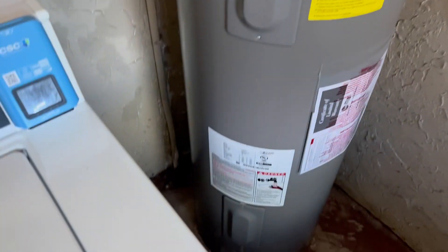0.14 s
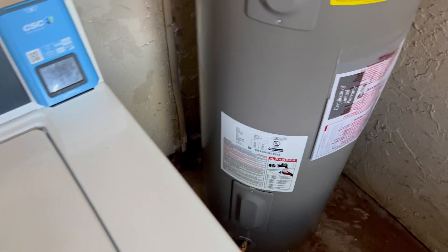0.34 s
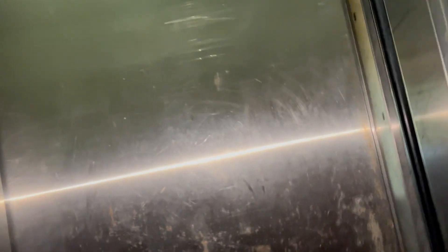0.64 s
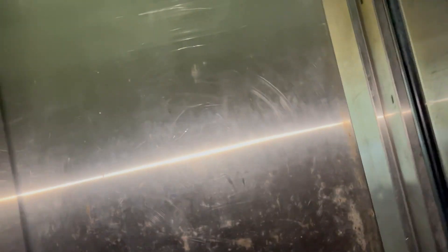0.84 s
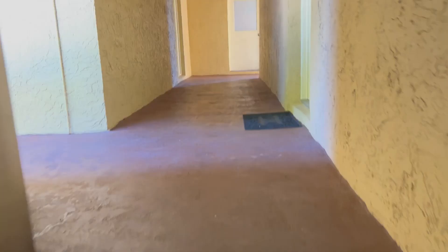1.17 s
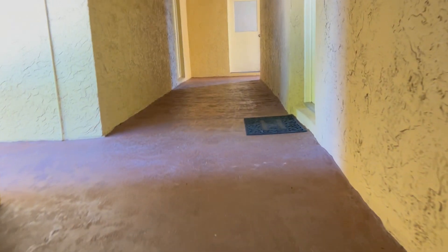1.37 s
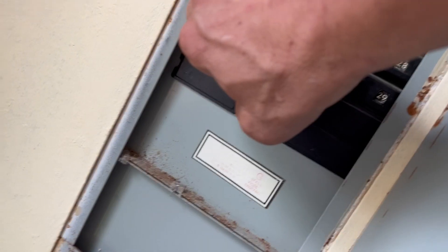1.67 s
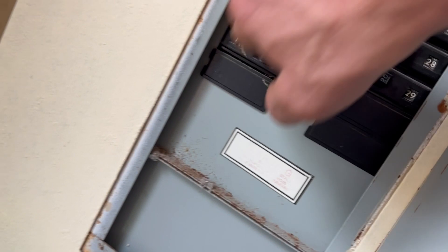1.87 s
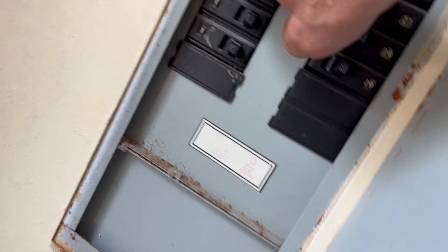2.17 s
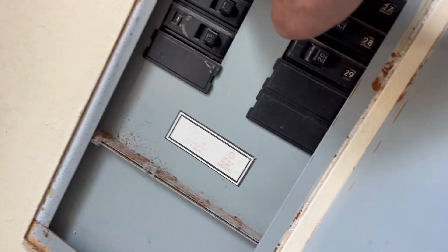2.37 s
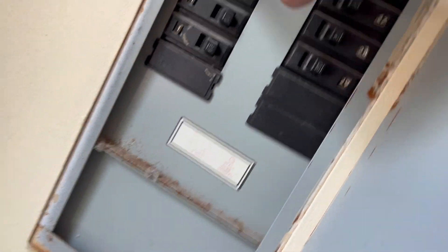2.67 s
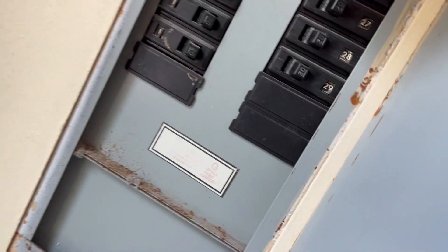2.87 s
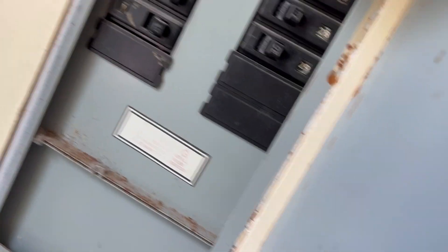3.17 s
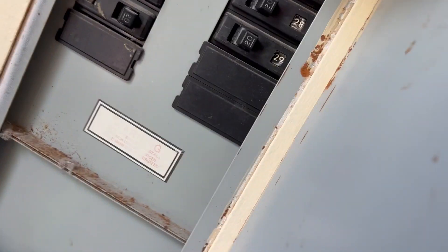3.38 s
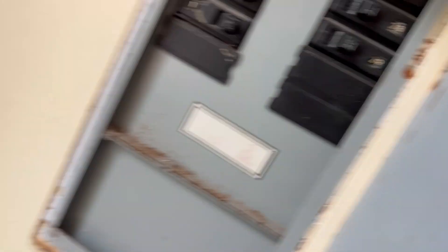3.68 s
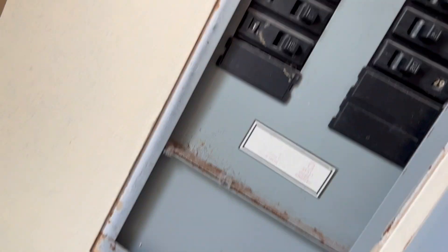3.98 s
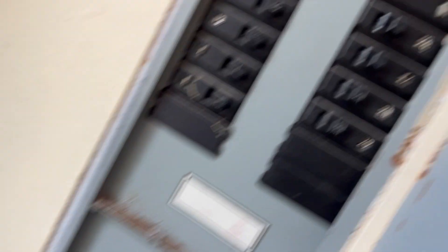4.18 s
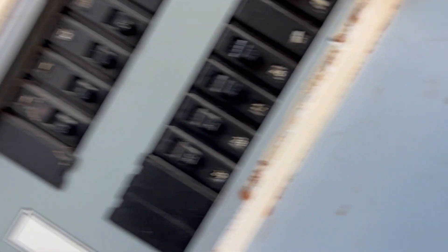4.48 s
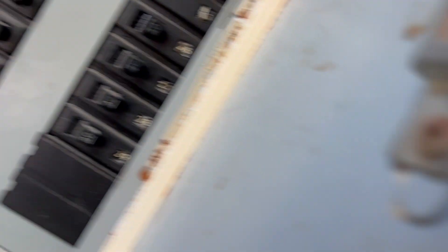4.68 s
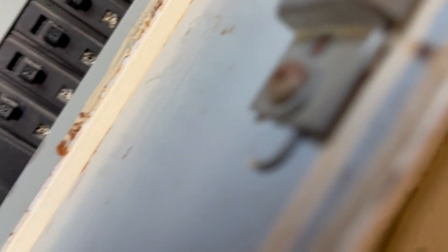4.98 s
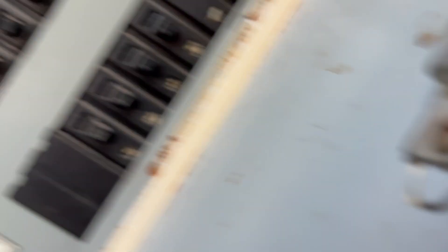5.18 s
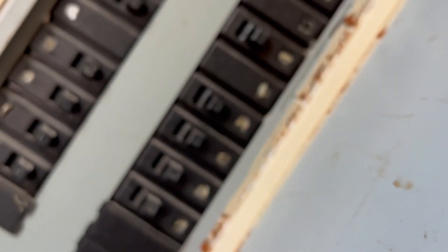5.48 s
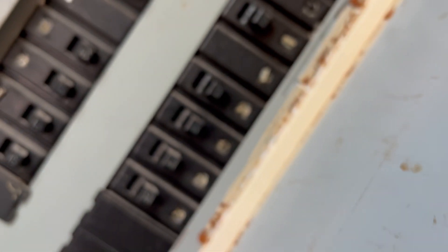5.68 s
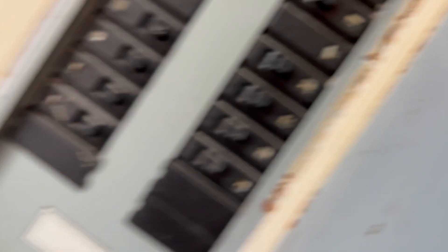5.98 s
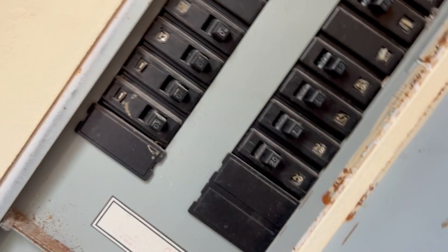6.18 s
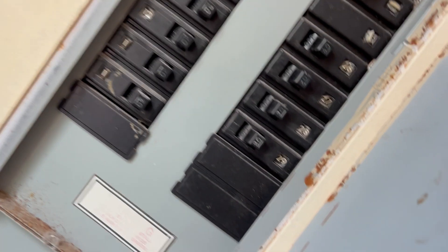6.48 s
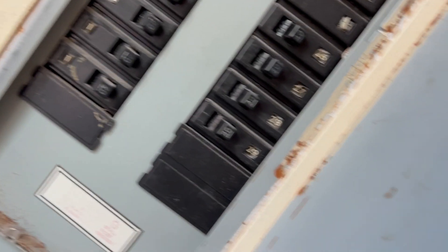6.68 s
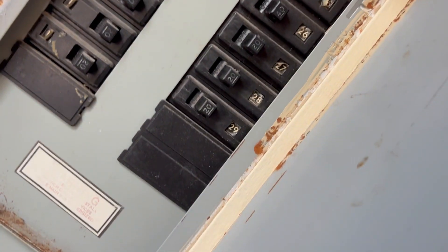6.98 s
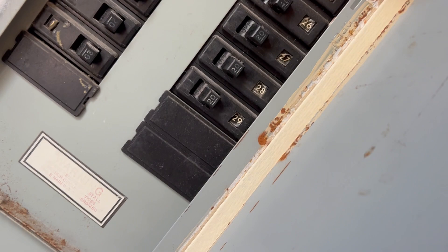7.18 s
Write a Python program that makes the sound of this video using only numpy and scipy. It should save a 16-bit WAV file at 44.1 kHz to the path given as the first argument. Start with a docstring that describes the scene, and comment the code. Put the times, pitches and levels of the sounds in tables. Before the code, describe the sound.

After a quiet humming closet and rumbling lift doors, stiff circuit breakers snap over loudly one by one in a hard, echoing room.

```python
"""Toggles tick, snap and bounce on a steel breaker panel in a hard room, with soft thuds nearby; before that come
a quiet closet, a lift car whose doors rumble and a corridor with a door rolling farther off, joined by short fades.
Contacts are bursts of shaped noise answered by steel and walls, thuds are decaying sines in a hollow wall,
doors, scrapes, squeaks and air are filtered noise. Two microphones hear it all, held otherwise in the lift."""
import sys
import numpy as np
from scipy import signal
from scipy.fft import rfft, irfft, next_fast_len
from scipy.io import wavfile
from scipy.ndimage import map_coordinates

SR = 44100
rng = np.random.default_rng(int(sys.argv[2]) if len(sys.argv) > 2 else 0)


def wav_record(signal):
    """Record a signal, one row per channel, as 16-bit PCM in the file named by sys.argv[1]."""
    frames = np.transpose(np.atleast_2d(signal))
    bounded = np.clip(frames, -1, 1)
    # unit amplitude maps onto the largest positive 16-bit level
    quanta = np.round(bounded * 32767).astype(np.int16)
    wavfile.write(sys.argv[1], SR, quanta)


def field_ratio(decibels):
    """Amplitude ratio for a level in dB (20 dB per decade); scalars and array-likes work."""
    return 10 ** (np.asarray(decibels, dtype=float) / 20)


N = 323253

# breakers thrown over: (t/s, level/dB, travel/s, relative latch click/dB, relative thump/dB)
THROWS = [(1.6073, -11.5, .026, 1.5, -6), (2.366, -8, 0.027, -2, -8), (3.516, -7.5, 0.022, -5, -14.5),
          (3.786, -6.5, .025, -3.5, -14), (4.9806, -3.5, .032, -10.5, -18.5),
          (5.8355, -6.5, .025, -2, -13.5), (6.5185, -8.5, 0.031, -5.5, -8.5),
          (7.0585, -8.5, .028, -10.5, -11)]
# the breaker of each throw: (clack pitch f/Hz, relative sparkle/dB, change of level along the travel/dB,
# spring pitch f/Hz, spring level/dB)
BREAKERS = [(2850, -11.5, 3.5, 2290, -40.5), (2660, -1.5, .3, 1400, -25.5), (3250, -4.5, 0.5, 3900, -32.5),
            (3700, -5, -3.5, 1947, -28), (3250, -3.5, 0.5, 3180, -28), (3700, -7.5, -1.5, 3600, -30),
            (3280, -5.5, -1.4, 1145, -29.5), (3230, -3, 1.5, 3090, -31)]


def unit(x):
    """Scaled to rms 1."""
    return x / np.sqrt(np.mean(x ** 2) + 1e-20)


def along(points, hz):
    """Reads (f/Hz, value) points on a log frequency axis."""
    f, v = np.transpose(points)
    return np.interp(np.log(hz + 1), np.log(f + 1), v)


def curves(rows):
    """One value per sample for each column after the time."""
    s, *cols = np.transpose(rows)
    return [np.interp(np.arange(N) / SR, s, c) for c in cols]


def wobble(rate):
    """A smooth random curve, rate knots a second."""
    knots = rng.standard_normal(int(N * rate / SR) + 4)
    return map_coordinates(knots, [np.arange(N) * rate / SR])


def filtered(x, response):
    """x shaped by a complex response of frequency."""
    m = next_fast_len(x.shape[-1] + 8192)
    spectrum = rfft(x, m) * response(np.fft.rfftfreq(m, 1 / SR))
    return irfft(spectrum, m)[..., :x.shape[-1]]


def noise(shape, response):
    """Coloured noise of rms 1."""
    return unit(filtered(rng.standard_normal(shape), response))


def peaks(modes, f):
    """Causal response of (f/Hz, width/Hz, level/dB) resonances."""
    return sum(field_ratio(db) * 1j * f * w / (c * c - f * f + 1j * f * w) for c, w, db in modes)


def band(lo_hz, hi_hz, f):
    """Steep band pass."""
    return 1 / np.sqrt((1 + (lo_hz / (f + 1)) ** 8) * (1 + (f / hi_hz) ** 8))


def contacts():
    """A throw slips its latch, lands its blade, then stops and rebounds; a tick is a single touch.
    Rows are (t/s, level/dB, thump/dB, sparkle/dB, pitch f/Hz)."""
    # blade landing, handle stop, rebound: (share of the travel, relative level/dB, thump change/dB,
    # sparkle change/dB)
    stages = [(.22, 0.63, -1, -1.2), (.62, 0.4, -0.7, -14), (1, -5, -9.5, -15)]
    # handles and fingernails: (t/s, level/dB, relative thump/dB, relative sparkle/dB, clack pitch f/Hz)
    ticks = [(2.1327, -37.5, -5, -28, 1264), (2.2096, -39.5, -6, -5, 1195),
             (2.2497, -23, -10.5, -1.5, 1387), (2.3492, -18.5, -17, -5, 1374),
             (2.8829, -37, -10, -20, 2700), (2.987, -44.5, -16, 2.5, 2070), (3.043, -44, -4, 0.5, 1240),
             (3.0632, -30, -11, -13, 5870), (3.1023, -34, -13, -5.5, 4970), (3.2285, -36.5, -9, -17, 2590),
             (3.28, -39, -24, -18, 2620), (3.2937, -19.5, -9.5, -4.5, 4260), (3.3817, -27, -15, -12, 1366),
             (4.1878, -45, -5, 2, 2800), (4.783, -9.5, -19.5, -9, 2946),
             (4.9248, -25.5, -20.5, -12.5, 3224), (5.583, -16, -16, -7.5, 2512), (6.217, -45, -6, 0, 2910),
             (6.2603, -33, -5.5, -27, 2600), (6.2949, -44, 3.5, -1, 2270), (6.4248, -17.5, -17, -1, 5700),
             (6.988, -14, -12, -4, 4080)]
    latches = [(s, db + latch_db, -34, -2.5, 4800) for s, db, _, latch_db, _ in THROWS]
    blows = []
    for (s, db, travel, _, thump_db), (hz, spark_db, later_db, *_) in zip(THROWS, BREAKERS):
        for share, stage_db, less_db, duller_db in stages:
            level_db = db + stage_db + share * later_db
            blows.append((s + share * travel, level_db, thump_db + less_db, spark_db + duller_db, hz))
    return latches + blows + ticks


def breakers():
    """Each contact: a sharp sparkle and a plastic clack with the walls' answer; the box thumps late, springs ring on."""
    # steel cover, heard in every tail: (f/Hz, width/Hz, level/dB)
    cover_modes = [(880, 60, 0), (1230, 50, 1), (1420, 50, 0), (1965, 50, 1), (2290, 50, 0), (2800, 70, 1),
                   (3080, 60, 1), (3300, 50, 2), (3560, 70, 1), (4190, 60, 0), (5430, 80, 0),
                   (5960, 80, -1)]
    # colour of the plastic crack: (f/Hz, level/dB per Hz)
    crack_colour = [(300, -41), (900, -0.5), (2000, -2.5), (3500, -1), (5500, -4), (7000, -9), (9000, -19)]
    # colour of the box thump: (f/Hz, level/dB per Hz)
    thump_colour = [(60, -37.5), (120, -7), (280, -8), (450, -3), (900, -14.5), (1500, -5.5), (2500, -43.5)]
    sharp, long, t = np.zeros((2, N + SR)), np.zeros(N + SR), np.arange(SR // 3) / SR
    s, db, thump_db, spark_db, clack_hz = np.transpose(contacts())[:, :, None, None]
    shape = (len(s), 2, len(t))

    def plastic(f, hump_db):
        hump = np.exp(-(np.log2((f + 1) / clack_hz) / 0.15) ** 2)
        return field_ratio(along(crack_colour, f) + hump_db * hump)

    def bright(f):
        return band(7900, 10700, f) * field_ratio(-f / 1500)

    # each blow drives the cover's modes differently
    strength = field_ratio(1.4 * rng.standard_normal((len(s), len(cover_modes), 1, 1)))

    def steel(f):
        return 1 + sum(strength[:, k] * np.abs(peaks([mode], f)) ** 2 for k, mode in enumerate(cover_modes))

    def wall_colour(f):
        clack_answer = field_ratio(20.5) * plastic(f, hump_db=5.0) * steel(f)
        return clack_answer + field_ratio(spark_db + 28.5) * bright(f)

    snap = field_ratio(-60 * t / .024) * (1 - np.exp(-t / .0007))
    clacks = noise(shape, lambda f: plastic(f, hump_db=11.0)) * field_ratio(-2.5) * snap
    sparks = noise(shape, bright) * field_ratio(spark_db + 2.0 - 60 * t / 0.017)
    walls = filtered(tails(len(s), early_db=9.0), wall_colour)
    swell = field_ratio(thump_db - 2.0 - 60 * t / 0.15) * (1 - np.exp(-t / 0.0051))
    thumps = noise(shape, lambda f: field_ratio(along(thump_colour, f))) * swell
    for k, start in enumerate(np.round(s * SR).astype(int).ravel()):
        sharp[:, start:][:, :len(t)] += field_ratio(db[k]) * (clacks[k] + sparks[k])
        sharp[:, start:][:, :walls.shape[2]] += field_ratio(db[k]) * walls[k]
        long[start:][:len(t)] += field_ratio(db[k, 0]) * thumps[k, 0]
    for (start_s, _, travel, *_), (*_, hz, ring_db) in zip(THROWS, BREAKERS):
        # a cluster of close modes, beating roughly
        buzz = noise(len(t), lambda f: peaks([(hz, 45, 0)], f) ** 2)
        spring = field_ratio(ring_db - 60 * t / 0.23) * (1 - np.exp(-t / 0.0021)) * buzz
        long[round((start_s + travel / 2) * SR):][:len(t)] += spring
    return sharp[:, :N], long[:N]


def tails(count, early_db):
    """Answers of the hard walls, energy 1: a quick early part and a slow one, each frequency dying at its own speed."""
    # slow part of the panel room: (f/Hz, t60/s)
    room_decay = [(150, 0.98), (500, 0.79), (2000, 0.67), (5000, 0.73), (9000, 0.7), (14000, 0.43)]
    size = 3 * SR // 4
    hz, t, z = signal.stft(rng.standard_normal((count, 2, size)), SR, nperseg=256)
    slow = field_ratio(-60 * t / along(room_decay, hz)[:, None])
    early = field_ratio(early_db - 60 * t / 0.077)
    tail = signal.istft(z * (slow + early), SR, nperseg=256)[1][..., :size]
    tail = tail * np.clip(np.arange(size) / SR / 0.0067, 0, 1)  # the first walls answer after a few ms
    return tail / np.linalg.norm(tail[:, :1], axis=2, keepdims=True)


def room(x, early_db):
    """Long sounds in the hard room, a fresh answer every third of a second."""
    out, step = np.zeros((2, N + 2 * SR)), SR // 3
    for k, tail in enumerate(tails(N // step + 1, early_db)):
        wet = signal.fftconvolve(x[None, k * step:(k + 1) * step], tail, axes=1)
        out[:, k * step:][:, :wet.shape[1]] += wet
    return out[:, :N]


def thuds():
    """Soft pushes through floor and wall ring the hollow wall's modes; where they land sets the balance."""
    # pushes: (t/s, level/dB, place on the wall from low mode -1 to middle mode 1, top mode over the level/dB)
    pushes = [(5.642, -25, 0.59, -15), (5.687, -25, 1, -10), (6.195, -34, 0.26, 0), (6.3, -42.5, 0.24, 5.5),
              (6.429, -42.5, -.2, 7), (6.535, -28, 0.21, 4.5), (6.773, -27.5, -0.76, -7.5),
              (7.07, -32, -0.46, 8), (7.295, -33, -.1, -7)]
    # hollow wall: (f/Hz, t60/s)
    wall_modes = [(114, 0.37), (166, 0.24), (292, 0.33)]
    place_db = 5.5
    out, t = np.zeros(N + SR), np.arange(SR // 2) / SR
    hz, t60 = np.transpose(wall_modes)[:, :, None]
    for s, db, spot, top_db in pushes:
        mode_db = db + np.array([[-place_db * spot], [place_db * spot], [top_db]])
        ring = field_ratio(mode_db - 60 * t / t60) * np.sin(2 * np.pi * hz * t)
        out[round(s * SR):][:len(t)] += (1 - np.exp(-t / 0.0028)) * ring.sum(0)
    return out[:N]


def doors(rows, spectrum, lumpy_db, rattle_under_db):
    """Wheels on an uneven track: rumble, lumps in the door leaf's body, a rattle of loose parts, brushes hissing."""
    # ringing parts of the door track: (f/Hz, width/Hz, level/dB)
    track_modes = [(71.4, 27, 2), (134.2, 7.2, 12), (223, 19, 3), (300, 18, 5.5), (5670, 520, -3),
                   (7200, 410, -4)]

    def layer(lo_hz, hi_hz):
        ringing = lambda f: np.abs(1 + peaks(track_modes, f))
        return noise((2, N), lambda f: field_ratio(along(spectrum, f)) * ringing(f) * band(lo_hz, hi_hz, f))

    lumps = field_ratio(lumpy_db * wobble(45.32))
    rumble_db, body_db, brush_db = curves(rows)
    rattle_db = body_db - rattle_under_db
    rumble = field_ratio(rumble_db) * layer(26, 140)
    body = field_ratio(body_db) * unit(lumps * layer(170, 810))
    rattle = field_ratio(rattle_db) * unit(lumps ** .5 * field_ratio(1.2 * wobble(150)) * layer(1100, 4400))
    brush = field_ratio(brush_db) * unit(field_ratio(1.85 * wobble(88.8)) * layer(3600, 21000))
    return rumble + body + rattle + brush


def lift_and_corridor_doors():
    """The same door mechanism close by in the lift and farther off in the corridor, each with its own colour."""
    # lift, then corridor, each with rows: (t/s, rumble level/dB, drag of the leaf level/dB, brush hiss level/dB)
    lift_rows, corridor_rows = [
        [(0.51, -44, -28.5, -31), (0.538, -26.5, -21, -27), (0.674, -22, -36.5, -50), (0.792, -22.5, -35, -45),
         (0.854, -23.5, -36, -51.5), (0.896, -23.5, -32.5, -41.5), (0.94, -11.5, -17, -30.5),
         (0.966, -15.5, -20, -36), (0.996, -11, -16, -23.5), (1.128, -16.5, -20.5, -36),
         (1.19, -24.5, -24, -36)],
        [(1.215, -38, -46, -58), (1.25, -32, -31.5, -44.5), (1.327, -34, -36.5, -50), (1.405, -26, -31, -41),
         (1.553, -32, -35.5, -46), (1.595, -30, -37, -46)],
    ]
    # colour of the lift: (f/Hz, level/dB per Hz)
    lift_colour = [(15, -37), (25, 3), (65, -1), (129, -15), (155, -6.5), (233, -10.5), (265, -18.5),
                   (399, -13), (587, -18), (1520, -27), (4810, -42.5), (5750, -41), (11500, -42.5),
                   (15000, -48), (15500, -52)]
    # colour of the corridor: (f/Hz, level/dB per Hz)
    corridor_colour = [(15, -40), (25, -6.5), (64, -6), (144, -20), (274, -26), (722, -31.5), (1300, -27),
                       (2300, -38.5), (5730, -38.5), (8580, -36.5), (9300, -38), (11200, -38), (14300, -53),
                       (15500, -43)]
    lift = doors(lift_rows, lift_colour, lumpy_db=0.0, rattle_under_db=9.5)
    corridor = doors(corridor_rows, corridor_colour, lumpy_db=2.5, rattle_under_db=5)
    return lift, corridor


def scrapes_and_squeaks():
    """Knocks, scrapes and track squeaks: resonant noise that starts quickly, fades a little and stops."""
    # knocks and scrapes: (t/s, length/s, f/Hz, width/Hz, level/dB)
    scrapes = [(0.514, 0.097, 1320, 252, -31.5), (0.511, 0.089, 300, 70, -28),
               (0.905, 0.028, 1720, 890, -24.5), (1.381, .06, 1490, 900, -34.5),
               (2.283, 0.079, 875, 500, -36), (4.361, 0.042, 910, 600, -50.5),
               (4.588, 0.23, 1000, 906, -52.5), (4.697, 0.14, 4300, 6000, -49),
               (6.202, 0.14, 890, 1500, -52), (6.763, 0.039, 704, 1000, -42.5)]
    # squeaks of the door track: (t/s, length/s, level/dB)
    squeaks = [(0.908, 0.039, -40), (0.974, .095, -37), (1.066, 0.12, -42.5), (1.35, 0.084, -40),
               (1.567, 0.023, -44)]
    rubs = [(*row, 5) for row in scrapes]  # the last column is the fade over the length, in dB
    rubs += [(s, length, 5580, 67, db, 3) for s, length, db in squeaks]
    out = np.zeros((2, N))
    for s, length, hz, width_hz, db, fade_db in rubs:
        u = np.arange(round(length * SR)) / (length * SR)  # 0 to 1 along the rub
        ends = np.minimum(1, np.minimum(u / 0.034, (1 - u) / 0.16))
        grain = noise((2, len(u)), lambda f: peaks([(hz, width_hz, 0)], f) ** 2)
        out[:, round(s * SR):][:, :len(u)] += field_ratio(db - fade_db * u) * ends * grain
    return out


def closet():
    """Still air, a low hum, and a faint thin ring dying away: coloured noise and an unsteady sine."""
    # colour of the closet: (f/Hz, level/dB per Hz)
    closet_colour = [(15, -55), (25, -25), (36, -16), (62, 4), (93, -22), (142, -9.5), (309, -24),
                     (354, -17), (529, -24.5), (1390, -24.5), (2020, -32.5), (3090, -33.5), (8320, -42),
                     (15000, -62)]
    colour = lambda f: field_ratio(along(closet_colour, f)) * np.abs(1 + peaks([(146.4, 6.9, 4.7)], f))
    t = np.arange(N) / SR
    ring_level = field_ratio(-37.5 - 60 * t / 0.6 + 3.4 * wobble(26))
    ring = ring_level * np.sin(2 * np.pi * 1412 * t + 2.5 * wobble(34))
    air = field_ratio(-43.5 + wobble(5)) * noise((2, N), colour)
    return air + ring * [[1], [.3]]


def background():
    """Wavering low hum of the building and a faint hiss, both filtered noise."""
    # colour of the panel room's air: (f/Hz, level/dB per Hz)
    air_colour = [(15, -37.5), (25, -31.5), (55, -1.5), (82, -18), (116, -6), (144, -14), (267, -17),
                  (389, -26.5), (421, -26.5), (722, -30.5), (1110, -32.5), (1410, -30.5), (1530, -33),
                  (15500, -58.5)]
    # hum, before it wavers: (t/s, level/dB)
    hum_level = [(1.62, -40.5), (2.08, -43), (3.6, -41.5), (4.7, -45.5), (5.7, -44.5), (7.33, -41.5)]
    hum_modes = [(61.0, 9.4, 1.2), (116.8, 29.0, 4.4)]
    resonant = lambda f: np.abs(1 + peaks(hum_modes, f))
    hum = noise((2, N), lambda f: field_ratio(along(air_colour, f)) * band(35, 180, f) * resonant(f))
    hiss = noise((2, N), lambda f: field_ratio(along(air_colour, f)) * band(270, 15800, f))
    drift_db, flicker_db = 1.5 * wobble(6), 1.2 * wobble(10)
    return field_ratio(curves(hum_level)[0] + drift_db) * hum + field_ratio(-52.5 + flicker_db) * hiss


def place(k):
    """Gain of place k: up after its cut, down before the next."""
    # where one place gives way to the next: (t/s)
    cuts = [0.5016, 1.203, 1.602]
    t, edges = np.arange(N) / SR, [-1, *cuts, 99]
    fade_in = np.clip((t - edges[k]) / 0.017, 0, 1)
    fade_out = np.clip((edges[k + 1] - t) / 0.033, 0, 1)
    return fade_in * fade_out


def microphones(pair, alike, lead):
    """A shared and an unshared sound field become left and right, with a phase lead that depends on frequency."""
    turn = lambda f: np.arccos(along(alike, f)) / 2
    both, apart = filtered(pair, lambda f: [np.cos(turn(f)), np.sin(turn(f))])
    # half the lead goes to each side, with opposite signs
    phase = lambda f: np.exp(.5j * np.outer([1, -1], np.interp(f, *np.transpose(lead))))
    return filtered(np.array([both + apart, both - apart]), phase)


def scene():
    """The four places, one after the other, each heard by the microphone pair."""
    # likeness of the two microphones: (f/Hz, likeness from 0 to 1)
    alike = [(60, .997), (250, .93), (600, .55), (1200, .25), (7800, .3), (8800, .985), (16000, .985)]
    # the same as held in the lift: (f/Hz, likeness from 0 to 1)
    alike_lift = [(60, .998), (290, .97), (640, .7), (3000, .5), (5200, .6), (6200, .98), (16000, .98)]
    # lead of the left microphone, negative where it lags: (f/Hz, phase/rad)
    lead = [(0, 0), (400, -.4), (2240, -6.4), (4000, -11.4), (7000, -12.9), (9600, -9.42), (16600, -.1)]
    # the same as held in the lift: (f/Hz, phase/rad)
    lead_lift = [(0, 0), (4300, 0), (5400, .6), (6800, 0), (13100, -3.14), (17000, -3.14)]
    sharp, long = breakers()
    low = thuds()
    rubs = scrapes_and_squeaks()
    lift, corridor = lift_and_corridor_doors()
    direct = sharp + (long + low) * [[1], [.12]]
    reverb = field_ratio(-0.5) * room(long + field_ratio(-4.0) * low, early_db=10.0)
    panel = direct + reverb + background()
    others = place(0) * closet() + place(2) * corridor + place(3) * panel + (1 - place(1)) * rubs
    in_lift = place(1) * (lift + rubs)
    return microphones(others, alike, lead) + microphones(in_lift, alike_lift, lead_lift)


def low_pass(x):
    """Removes everything above the highest recorded frequency."""
    return signal.sosfilt(signal.butter(12, 17170, fs=SR, output="sos"), x)


def record(dry):
    """Peaks are softly clipped, then the deepest bass and the top of the band are shelved off."""
    clipped = dry / (1 + np.abs(dry / 1.05) ** 6) ** (1 / 6)
    shelf_hz = [0, 15, 35, 15700, 15900, 16900, 17200]
    shelf_gain = [0, .1, 1, 1, .1, .05, 0]
    mix = filtered(clipped, lambda f: np.interp(f, shelf_hz, shelf_gain))
    return low_pass(mix)


dry = scene()
out = record(dry)
wav_record(out)
```